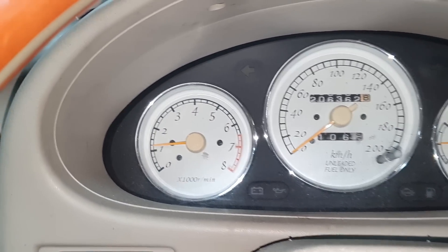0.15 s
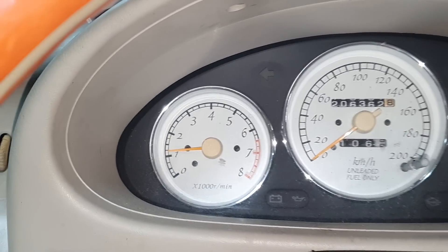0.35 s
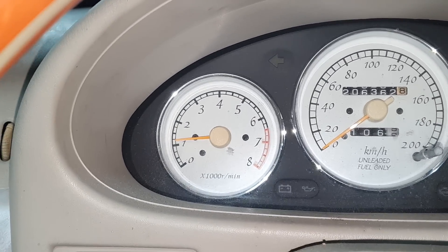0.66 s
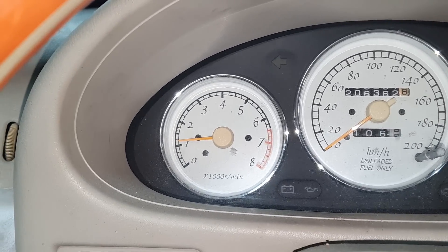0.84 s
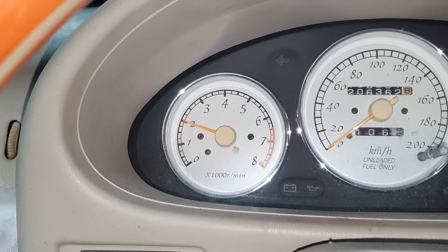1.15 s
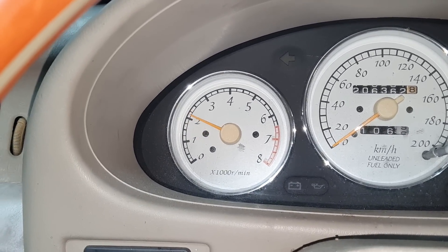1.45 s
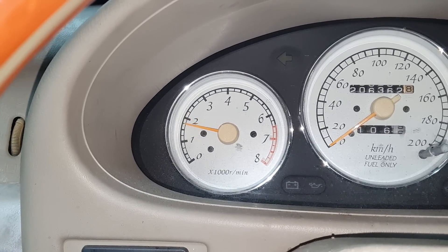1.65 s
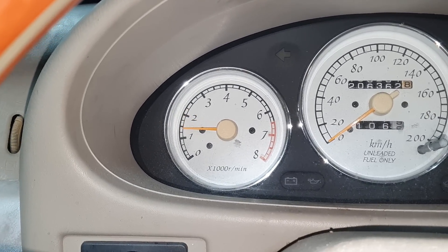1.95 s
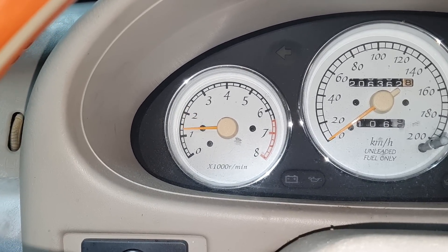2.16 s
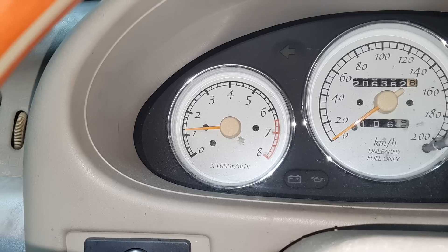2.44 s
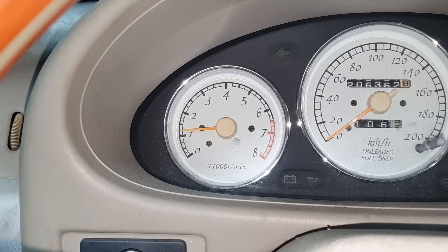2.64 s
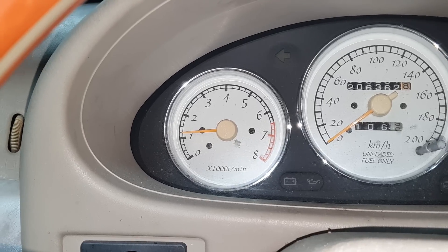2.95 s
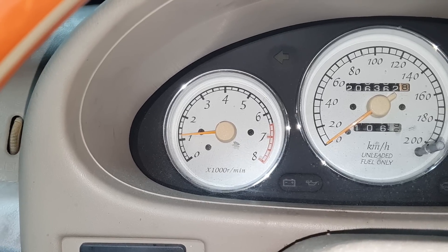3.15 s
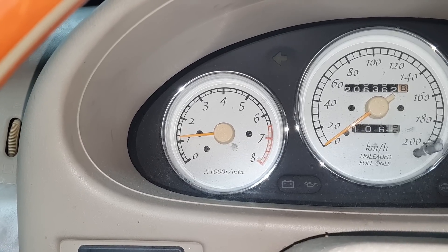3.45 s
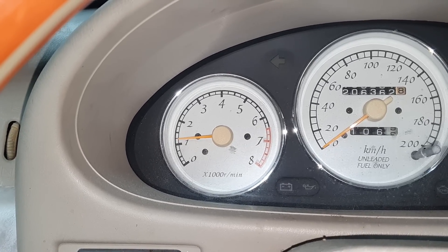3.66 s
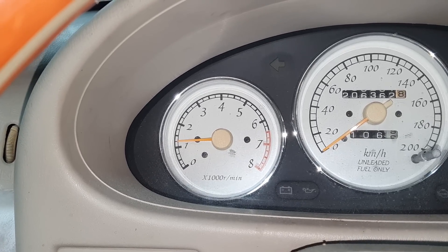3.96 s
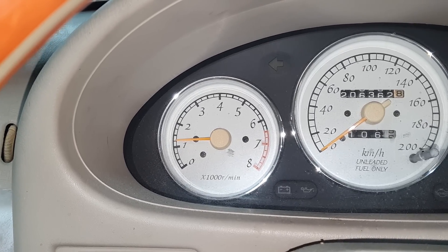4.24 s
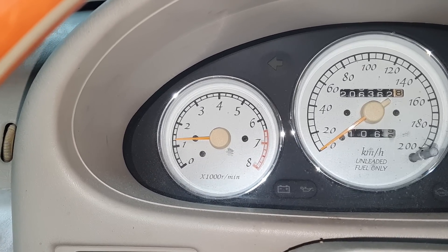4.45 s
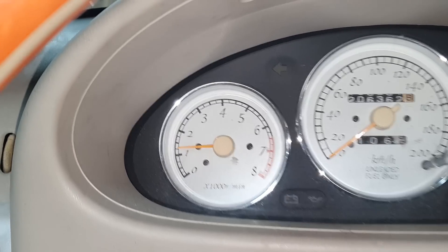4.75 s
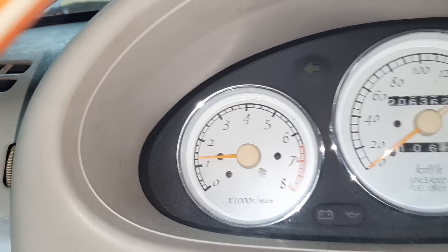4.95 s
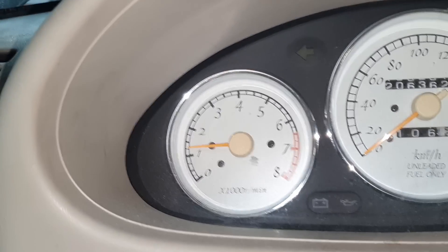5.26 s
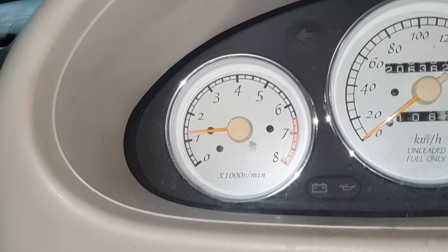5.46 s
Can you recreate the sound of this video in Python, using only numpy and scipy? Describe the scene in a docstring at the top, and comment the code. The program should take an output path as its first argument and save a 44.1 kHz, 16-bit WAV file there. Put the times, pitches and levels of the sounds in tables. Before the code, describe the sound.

From the driver's seat, a clattering four-cylinder idle gets one quick rev, settles, then sags briefly as a compressor and fan kick in.

```python
"""A small four-cylinder engine idles, heard from the driver's seat: firings shake the body, valve gear
clatters, the belt drive whines. At 0.9 s the throttle is blipped and the intake barks; the cabin booms
and the engine stumbles as the revs fall, then the belt chirps. At 2.4 s a relay clicks and the idle
valve hisses open. At 3 s the air-conditioning clutch bites and drags the idle down; the revs recover
while the radiator fan spins up and throbs against the engine."""
import sys
import numpy as np
from scipy import signal
from scipy.fft import rfft, irfft, next_fast_len
from scipy.io import wavfile
from scipy.ndimage import uniform_filter1d, map_coordinates

SR = 44100
rng = np.random.default_rng(int(sys.argv[2]) if len(sys.argv) > 2 else 0)


def file_out(sig):
    """Save sig as 16-bit WAV at sys.argv[1]."""
    # one column per channel
    cols = np.atleast_2d(sig).T
    # limit, then scale
    lim = np.clip(cols, -1, 1)
    pcm = np.round(lim * 32767).astype(np.int16)
    wavfile.write(sys.argv[1], SR, pcm)


N = 246959
T = np.arange(N) / SR
SIZE = next_fast_len(N)
FREQ = np.maximum(np.arange(SIZE // 2 + 1) * SR / SIZE, 1e-3)
IDLE_HZ, CLUTCH_S = 19.83, 3.008

# cabin transmission: freq_hz, gain_db
CABIN_PASS = [(20, 0), (250, 0), (285, -15), (420, -24), (1500, -70)]
# cabin stereo field: freq_hz, side_minus_mid_db, left_minus_right_db
STEREO_FIELD = [(48, -27, -4.5), (131, -42, 1), (244, -30, -0.5), (376, -8, -1.5), (504, -7, 3.5),
                (710, 3.5, 1.5), (1260, -5, 1), (2360, -2, 1.3), (4600, 1, 1.5), (7950, -2.5, 3),
                (13000, 2, 3.5)]
# clatter through the engine covers: freq_hz, gain_db
CLATTER_SPECTRUM = [(200, -41), (500, -1), (800, 1), (1020, -4.5), (1300, 3.5), (1800, -1), (2700, -1),
                    (3200, -3), (4100, -4), (5500, -10.5), (8000, -16.5), (11000, -23), (16000, -29)]
# relay strike and bounce: start_s, level_db, left_minus_right_db, highpass_hz
RELAY_STRIKES = [(2.4175, -30, -7, 2200), (2.423, -36.5, 8, 700)]


def engine_note(turns, revs, throttle, surge):
    """Two firings a turn shake the body; unequal cylinders add odd and half orders."""
    # firing tones: order, idle_db, revs_db_per_octave, strain_db, compressor_db, surge_db
    firing_orders = [(2, -30.5, 12, 4.3, 1.5, 5.5), (4, -30, -0.5, 28.2, -6, -2),
                     (6, -30.5, -10.5, 21, -1.5, 6)]
    # weak crankshaft tones: order, free_db, loaded_db
    minor_orders = [(2.5, -42, -57), (3, -44.5, -46), (3.5, -62, -45), (4.5, -57, -46), (5, -56, -48),
                    (5.5, -52, -63), (6.5, -63, -51), (7, -59, -59), (7.5, -58, -47), (8, -37.5, -33),
                    (8.5, -58, -63), (9, -53, -58), (9.5, -61, -45.5), (10, -52, -35.5), (11, -46.5, -42.5),
                    (11.5, -59, -49), (12, -46, -40)]
    # cabin booms and misfire dips on order 2: centre_s, half_width_s, gain_db
    booms = [(1.053, 0.043, 13.5), (1.392, 0.068, 10), (1.508, 0.015, 11), (1.55, .02, -5),
             (1.637, 0.047, 13.5), (1.685, .016, -6), (1.784, 0.057, 9.5), (1.97, 0.048, 11.5)]
    strain = throttle * np.clip(1 - revs, 0, 1)
    load = ramp(CLUTCH_S, .88)
    boom_db = sum(db * swell(s, half_width_s) for s, half_width_s, db in booms)
    levels = [(k, level_db(law, (revs, strain, load, surge)) + boom_db * (k == 2) + 1.16 * drift(14))
              for k, *law in firing_orders]
    effort_db = -4.5 * revs + 28 * strain
    levels += [(k, free_db + (loaded_db - free_db) * load + effort_db + .5 * drift(6))
               for k, free_db, loaded_db in minor_orders]
    smear_rad = .23  # the mounts delay higher orders, smearing each push into a rumble
    note = sum(undb(db) * np.cos(2 * np.pi * k * turns - smear_rad * k * k) for k, db in levels)
    balance = spectrum(STEREO_FIELD, column=2) ** np.array([[.5], [-.5]])
    return through(note * unevenness(revs, throttle), spectrum(CABIN_PASS) * balance)


def crank_speed(drag_hz=1.1, drag_s=.11, idle_up_hz=1.35, recover_s=.74):
    """Turns a second: idle, blip, sag under the compressor, recovery to a faster idle."""
    # throttle blip: time_s, above_idle_hz
    blip = [(.87, 0), (.94, 2.8), (1.1, 14.4), (1.27, 19.7), (1.4, 15.2), (1.51, 10.3), (1.77, 4.7),
            (2.0, 1.6), (2.2, .21)]
    recovered = 1 - np.exp(-(age(CLUTCH_S) / recover_s) ** 1.5)
    governed_hz = (drag_hz + idle_up_hz) * recovered - drag_hz * ramp(CLUTCH_S, drag_s)
    return IDLE_HZ + curve(blip) + governed_hz


def unevenness(revs, throttle, idle_db=.5, overrun_db=1.6, loaded_db=.7):
    """Firing gain: burning is most uneven on the overrun and under compressor load."""
    overrun = np.clip(2 * revs, 0, 1) * (1 - throttle)
    return undb((idle_db + overrun_db * overrun + loaded_db * ramp(CLUTCH_S, 1)) * drift(35))


def engine_noise(turns, revs, throttle, airflow, surge):
    """Valve gear clatters through the covers; intake roar and uneven burning pulse with each firing."""
    # ringing peaks in the clatter, plus a faint thin tone near 12.8 kHz: freq_hz, width_hz, gain_db
    clatter_peaks = [(1195, 14, 0), (1255, 30, -6), (1557, 16, -1), (1657, 32, 0), (1770, 35, -3),
                     (1971, 14, -2), (2470, 70, -11), (3832, 20, -3), (4620, 25, 2), (12790, 100, -4)]
    # intake roar: freq_hz, gain_db
    intake_spectrum = [(180, -31), (280, 0.5), (400, -1.5), (470, -2.5), (600, -7.5), (780, -8),
                       (950, -16.5), (1500, -29), (4000, -57)]
    # body shake: freq_hz, gain_db
    shake_spectrum = [(20, -27), (33, -3), (50, 17), (95, 6.5), (150, 5), (240, 6), (275, -18), (400, -45)]
    load, slow_load = ramp(CLUTCH_S, .11), ramp(CLUTCH_S, .53)
    clatter_db = level_db((-44.5, 8.5, 3, 3, 1.7), (revs, airflow, slow_load, surge))
    intake_db = level_db((-50, 11, 8, 6, 1.5), (revs, throttle, load, surge))
    shake_db = level_db((-38.5, 6, 8, 3, -1), (revs, throttle, load, surge))
    colour = spectrum(CLATTER_SPECTRUM) * (1 + resonances(clatter_peaks)) * reflections()
    impacts = cyclic_noise(turns, share=.37) * throb(turns, .026) * undb(.5 * drift(40))
    clatter = diffuse(impacts, colour)
    intake = diffuse(cyclic_noise(turns, share=.48) * throb(turns, .032), spectrum(intake_spectrum))
    shake = diffuse(noise() * throb(turns, .23), spectrum(shake_spectrum))
    return clatter * undb(clatter_db) + intake * undb(intake_db) + shake * undb(shake_db)


def stumbles():
    """Hard firings on the throttle and late ones on the overrun jolt the mounts and ring the cabin."""
    # jolts: start_s, peak_db, highpass_hz
    jolts = [(.953, -15, 60), (.998, -17, 150), (1.021, -16, 150), (1.095, -22, 340), (1.522, -15, 50),
             (1.561, -22, 190), (1.628, -13.5, 60), (1.672, -21, 160), (1.707, -18.5, 50), (1.767, -23, 50),
             (1.787, -21, 60), (1.81, -22, 70), (1.919, -23, 150), (2.078, -27, 150)]
    # cabin air and panel modes: freq_hz, width_hz, gain_db
    cabin_modes = [(70.5, 65, 20), (115, 65, 9), (170, 30, -2), (228, 56, -2), (388, 130, 3)]
    cabin = resonances(cabin_modes) * spectrum(CABIN_PASS) / (1 + (FREQ / 550) ** 4)
    out = 0
    for start_s, db, highpass_hz in jolts:
        jolt = irfft(cabin / (1 + (highpass_hz / FREQ) ** 10), SIZE)
        out += np.roll(jolt, int(start_s * SR))[:N] * undb(db) / np.max(np.abs(jolt))
    return out * pan(-.32)


def brief_hums():
    """Brief wavering hums, including the engine's 156 Hz hum swelling under compressor load."""
    # hums: centre_s, half_width_s, pitch_hz, waver_width_hz, level_db
    hums = [(1.002, 0.058, 203, 19, -23.5), (1.03, 0.079, 369.5, 14, -32.5), (1.164, 0.018, 228, 19.3, -22),
            (1.27, 0.1, 47, 7.8, -22.5), (1.323, 0.072, 228.2, 18.4, -28), (1.868, 0.069, 410.6, 14, -41),
            (1.977, 0.17, 199.5, 20.7, -39.5), (2.256, 0.044, 49, 10.6, -27), (3.07, .03, 232, 8.5, -35.5),
            (3.164, 0.028, 238, 8.3, -29.5), (3.272, 0.023, 228, 7.8, -35.5),
            (3.38, 0.039, 232.3, 8.5, -33), (3.27, .1, 155.5, 1.8, -34.5),
            (3.48, 0.092, 156.6, 2.96, -27.5), (3.743, 0.05, 411, 27, -40.5), (3.56, 0.12, 2600, 71, -53)]
    return sum(undb(db) * swell(s, half_width_s) * wavering_tone(hz, width_hz / 2, rate_hz=40.4)
               for s, half_width_s, hz, width_hz, db in hums)


def intake_bark(turns, revs, throttle, scatter_db=3):
    """Each firing gulps air and rings the duct, hardest with the throttle open at low revs."""
    # duct modes: freq_hz, width_hz, gain_db
    duct_modes = [(228, 52, 3), (365, 42, -1.5), (517, 50, -15), (775, 60, -11)]
    gulps = np.diff(np.floor(2 * turns), prepend=0) * undb(scatter_db * drift(70))
    ring = through(gulps, resonances(duct_modes) * resonances([(370, 460, 0)]))
    return unit_rms(ring) * throttle * undb(-32 - 8 * revs)


def air_box(turns, revs, airflow):
    """Gulps of air ring the hollow box, louder with flow and load."""
    # box modes: freq_hz, width_hz, gain_db
    box_modes = [(691, 41, -3), (737, 23, 0.5), (816, 33, -7)]
    db = level_db((-54, 8.5, 5, 8), (revs, airflow, ramp(CLUTCH_S, .34)))
    gulps = cyclic_noise(turns, share=.41) * throb(turns, .21)
    return diffuse(gulps, resonances(box_modes) * resonances([(730, 640, 0)])) * undb(db)


def radiator_fan(crank_turns, full_hz=35.68, spin_up_s=.335, gust_db=6.5):
    """The fan runs up and blows in gusts; the engine rocks its mount, adding sidebands to the drone."""
    # shaft wobble and seven blades: order, level_db
    fan_orders = [(1, -37), (2, -24.5), (3, -38), (4, -29.5), (5, -40.5), (6, -44), (7, -35), (9, -51),
                  (14, -46), (15, -49.5), (19, -58), (21, -62), (23, -57)]
    speed = 1 - np.exp(-age(CLUTCH_S) / spin_up_s)
    turns = np.cumsum(full_hz * speed) / SR
    drone = sum(undb(db + .5 * drift(16)) * np.cos(2 * np.pi * (k * turns + rng.random()))
                for k, db in fan_orders)
    drone *= speed ** 5 * throb(crank_turns, .19)
    # air rush: freq_hz, gain_db
    air_spectrum = [(150, -16), (290, -3), (400, -11), (600, -8), (780, 10), (1000, 13), (1600, 9.5),
                    (3500, 4), (5000, -9), (10000, -39), (16000, -31)]
    air = diffuse(noise(), spectrum(air_spectrum)) * undb(-46 + gust_db * drift(3.64)) * speed ** 2
    return drone * pan(-3.5) + air


def relay(t60_s=.046, muffle_hz=12000):
    """The armature snaps shut and bounces; the tiny case radiates no bass, the dashboard dulls the top."""
    # case modes: freq_hz, width_hz, gain_db
    case_modes = [(1150, 550, -4), (2600, 600, -2), (3550, 800, 1), (4600, 690, -1), (6060, 380, -1),
                  (9400, 1100, -9), (12500, 3000, -18)]
    case = resonances(case_modes) / (1 + (FREQ / muffle_hz) ** 2)
    out = 0
    for start_s, db, pan_db, highpass_hz in RELAY_STRIKES:
        response = unit_rms(case / (1 + (highpass_hz / FREQ) ** 6))
        rattle = noise() * (T >= start_s) * decay(start_s, t60_s)
        out += through(rattle, response) * undb(db) * pan(pan_db)
    return out


def clutch(bite_s=.015):
    """The compressor clutch plate scrapes before it grips, leaving a softer hiss."""
    # plate friction: freq_hz, gain_db
    rub_spectrum = [(300, -2), (800, 5.5), (2000, 4), (3000, 2), (4500, 2.5), (7000, -3), (10000, -11),
                    (16000, -9)]
    peak_s = CLUTCH_S + bite_s
    slip = ramp(CLUTCH_S, bite_s) * (decay(peak_s, t60_s=.22) + undb(-8.5) * decay(peak_s, t60_s=.9))
    return diffuse(noise(), spectrum(rub_spectrum)) * slip * undb(-36)


def idle_valve(delay_s=.076, open_s=.58):
    """The relay opens the valve ahead of the clutch; extra air hisses in."""
    # valve air: freq_hz, gain_db
    air_spectrum = [(300, -7), (700, 11), (1000, -1.5), (1300, 6.5), (2600, 0), (3200, -1), (4000, 2.5),
                    (5500, -8.5), (8000, -17.5), (16000, -17.5)]
    opening = ramp(RELAY_STRIKES[0][0] + delay_s, open_s)
    return diffuse(noise(), spectrum(air_spectrum)) * opening * undb(-47)


def belt_whine(turns, alternator_order=27):
    """Belt, gear and alternator tones follow the crankshaft; compressor load shifts their mix."""
    # belt and gear tones: order, free_db, loaded_db
    whines = [(15, -66, -52), (16, -58, -62), (18, -58, -53), (20, -62, -54), (21, -68, -53),
              (22, -63, -63), (34.5, -55, -55), (38, -57, -53)]
    # alternator whine: time_s, level_db
    alternator_levels = [(0, -49), (.2, -45), (.62, -45), (.9, -55), (2.0, -60), (2.2, -53), (3.0, -55),
                         (3.4, -49), (3.8, -62)]
    load = ramp(CLUTCH_S, .12)
    tones = sum(undb(free_db + (loaded_db - free_db) * load + drift(6)) * np.sin(2 * np.pi * k * turns)
                for k, free_db, loaded_db in whines)
    alternator = undb(curve(alternator_levels)) * np.sin(2 * np.pi * alternator_order * turns)
    return (tones + alternator) * pan(1.1)


def metal_ticks(t60_s=.093):
    """Loose metal strikes and rings briefly through the engine covers."""
    # strikes: start_s, level_db
    strikes = [(1.8555, -39.5), (2.1934, -39.5), (2.8515, -47), (4.827, -46)]
    envelope = sum(undb(db) * (T >= s) * decay(s, t60_s) for s, db in strikes)
    return diffuse(noise(), resonances([(2700, 3800, 0)]) * spectrum(CLATTER_SPECTRUM)) * envelope


def throttle_hiss(revs, throttle, centre_hz=7200, width_hz=7000):
    """Air rushes past the open throttle plate, growing steeply with the revs."""
    rush = diffuse(noise(), resonances([(centre_hz, width_hz, 0)]) ** 2)
    return rush * undb(-54) * throttle * np.maximum(revs, 0) ** 3


def belt_chirps(half_width_s=.018):
    """The belt slips in short, faint squeaks."""
    # slips: centre_s, level_db
    slips = [(2.14, -57), (2.2, -55), (2.28, -56), (2.39, -58), (2.6, -58), (2.66, -58), (2.79, -55)]
    envelope = sum(undb(db) * swell(s, half_width_s) for s, db in slips)
    return envelope * wavering_tone(4625, waver_hz=20, rate_hz=60)


def whistles(flicker_db=3):
    """Thin high tones flicker over the idle."""
    # tones: pitch_hz, level_db
    tones = [(1971, -65), (4620, -70), (12790, -83)]
    return sum(undb(db + flicker_db * drift(12)) * wavering_tone(hz, waver_hz=6, rate_hz=25)
               for hz, db in tones)


def hiss():
    """Steady faint hiss, stronger on the left."""
    return noise() * undb(-66) * pan(14.7)


def reflections(wet_db=-10, t60_s=.071):
    """Response of short echoes off glass and trim: fine peaks and dips."""
    tail = rng.standard_normal(N) * decay(0, t60_s)
    wet = undb(wet_db)
    return (1 + wet * rfft(tail, SIZE) / np.sqrt(np.sum(tail ** 2))) / np.sqrt(1 + wet ** 2)


def diffuse(pair, response):
    """Filter two unrelated signals into a cabin field: alike in the bass, wide in the treble; rms 1."""
    width, tilt = spectrum(STEREO_FIELD), np.sqrt(spectrum(STEREO_FIELD, column=2))
    mid, side = rfft(pair, SIZE) * response / np.sqrt(1 + width ** 2)
    left, right = (mid + width * side) * tilt, (mid - width * side) / tilt
    return unit_rms(irfft(np.array([left, right]), SIZE)[:, :N])


def cyclic_noise(turns, share, size=4400):
    """Noise pair; a share of its power repeats every two crankshaft turns."""
    patterns = rng.standard_normal((2, size))
    place = turns / 2 % 1 * size
    repeating = np.array([map_coordinates(p, [place], order=3, mode="grid-wrap") for p in patterns])
    return np.sqrt(share) * repeating + np.sqrt(1 - share) * noise()


def throb(turns, depth):
    """Gain pulsing at the firing rate."""
    return 1 + depth * np.cos(2 * np.pi * 2 * turns)


def wavering_tone(pitch_hz, waver_hz, rate_hz):
    """Sine with a drifting pitch."""
    return np.sin(2 * np.pi * np.cumsum(pitch_hz + waver_hz * drift(rate_hz)) / SR)


def drift(rate_hz, steps=8):
    """Smooth random drift, spread near 1."""
    held = np.repeat(rng.standard_normal(int(N / SR * rate_hz) + 2), steps)
    smooth = uniform_filter1d(uniform_filter1d(held, steps), steps)
    return 1.3 * np.interp(T * rate_hz * steps, np.arange(len(held)), smooth)


def noise():
    """Two unrelated white noises."""
    return rng.standard_normal((2, N))


def spectrum(rows, column=1):
    """Gain per frequency from dB points on a log axis."""
    rows = np.array(rows)
    return undb(np.interp(np.log(FREQ), np.log(rows[:, 0]), rows[:, column]))


def resonances(modes):
    """Response of damped modes."""
    return sum(undb(db) / (1 + 1j * (FREQ / hz - hz / FREQ) * hz / width_hz) for hz, width_hz, db in modes)


def through(x, response):
    """Filter by a frequency response."""
    return irfft(rfft(x, SIZE) * response, SIZE)[..., :N]


def level_db(law, controls):
    """law: dB at idle, then dB added per unit of each control."""
    idle_db, *added_db = law
    return idle_db + sum(db * control for db, control in zip(added_db, controls))


def curve(rows):
    """Timed points joined by lines."""
    return np.interp(T, *np.transpose(rows))


def age(start_s):
    """Seconds since the start, 0 before."""
    return np.maximum(T - start_s, 0)


def decay(start_s, t60_s):
    """1 until the start, then an exponential fall."""
    return undb(-60 * age(start_s) / t60_s)


def ramp(start_s, length_s):
    """Rise from 0 to 1."""
    return np.clip((T - start_s) / length_s, 0, 1)


def swell(centre_s, half_width_s):
    """Bell curve, top 1."""
    return np.exp(-np.minimum(((T - centre_s) / half_width_s) ** 2, 20))


def pan(left_minus_right_db):
    """Left and right gains."""
    return undb(np.array([[.5], [-.5]]) * left_minus_right_db)


def undb(db):
    """Decibels to gain."""
    return 10 ** (np.asarray(db) / 20)


def unit_rms(x):
    """Scale to rms 1."""
    return x / np.sqrt(np.mean(np.abs(x) ** 2))


def scene(pedal_s=.916, press_s=.058, hold_s=.231, release_s=.16, right_lag_s=.00045):
    """Crankshaft speed and load drive the engine; the sound reaches the left side first."""
    speed_hz = crank_speed()
    turns = np.cumsum(speed_hz * (1 + .001 * drift(12))) / SR
    revs = np.log2(speed_hz / IDLE_HZ)  # octaves above idle
    throttle = ramp(pedal_s, press_s) - ramp(pedal_s + press_s + hold_s, release_s)
    airflow = throttle * speed_hz / speed_hz.max()
    surge = swell(CLUTCH_S + .81, .79)  # the governor's extra push
    mix = engine_note(turns, revs, throttle, surge) + engine_noise(turns, revs, throttle, airflow, surge)
    mix += air_box(turns, revs, airflow) + intake_bark(turns, revs, throttle)
    mix += throttle_hiss(revs, throttle) + idle_valve()
    mix += belt_whine(turns) + belt_chirps()
    mix += stumbles() + metal_ticks() + brief_hums() + whistles()
    mix += radiator_fan(turns) + relay() + clutch()
    left, right = mix
    late_right = np.interp(T - np.round(right_lag_s * SR) / SR, T, right)
    return np.array([left, late_right]) + hiss()


def record(dry):
    """Steep low-pass at 15750 Hz."""
    return signal.sosfilt(signal.ellip(10, .1, 80, 15750, fs=SR, output="sos"), dry)


dry = scene()
out = record(dry)
file_out(out)
```